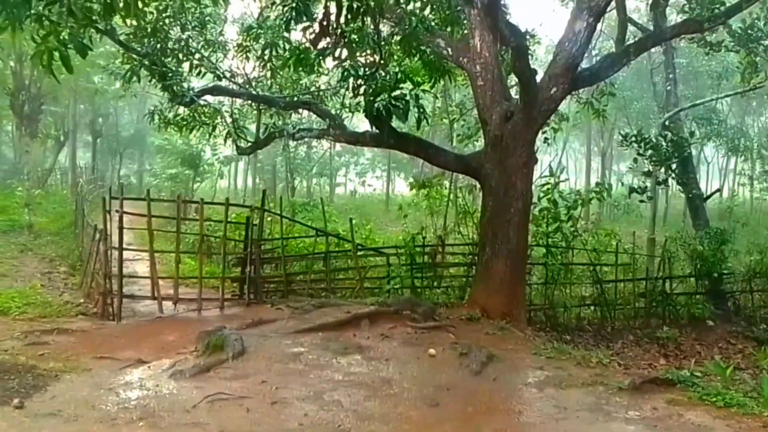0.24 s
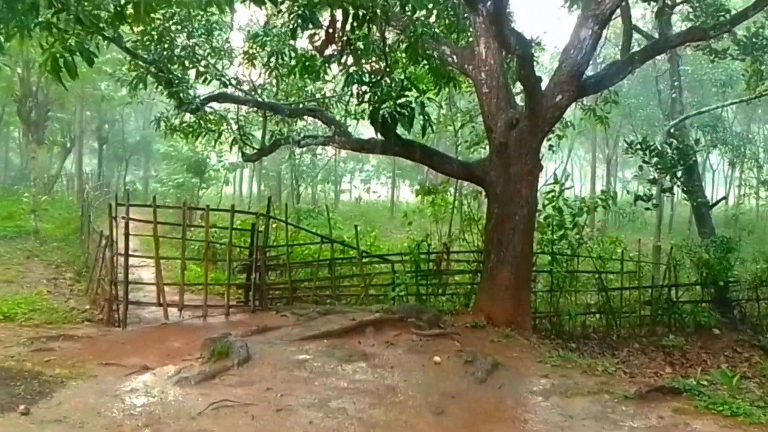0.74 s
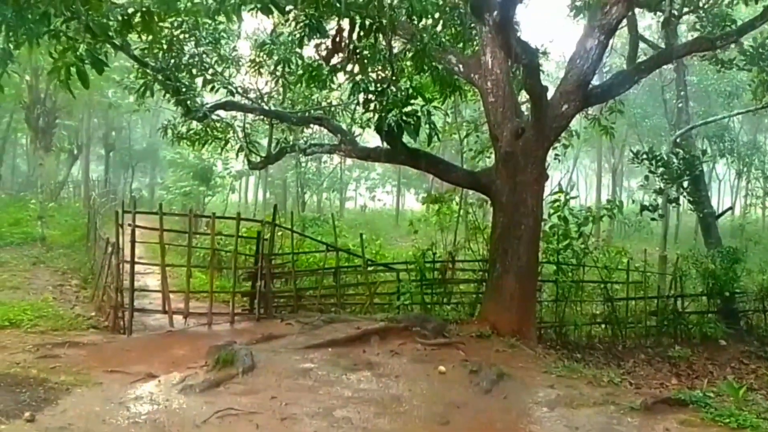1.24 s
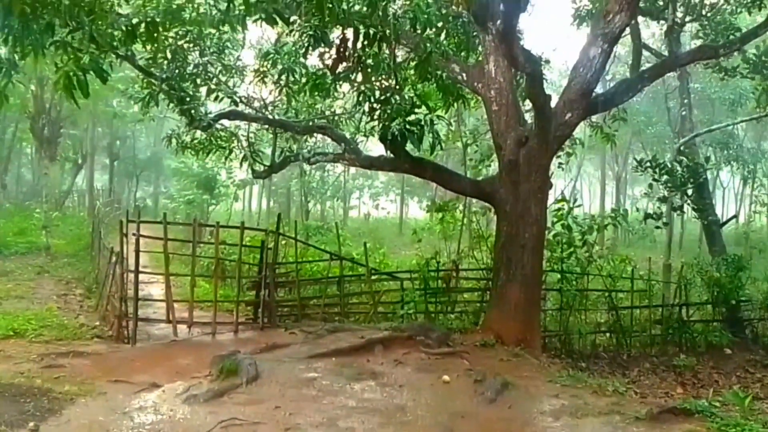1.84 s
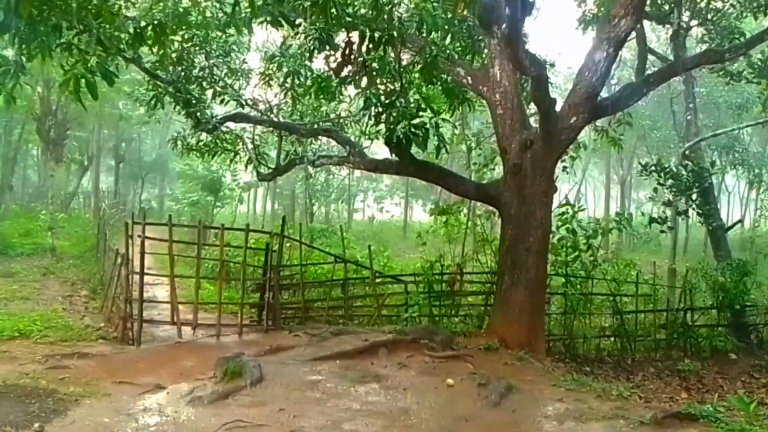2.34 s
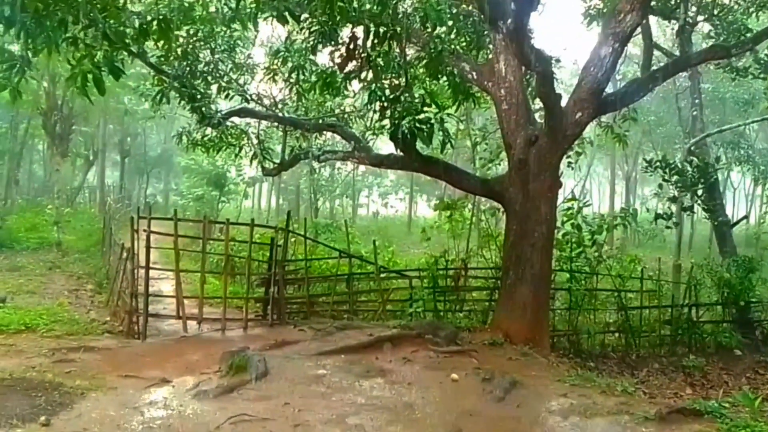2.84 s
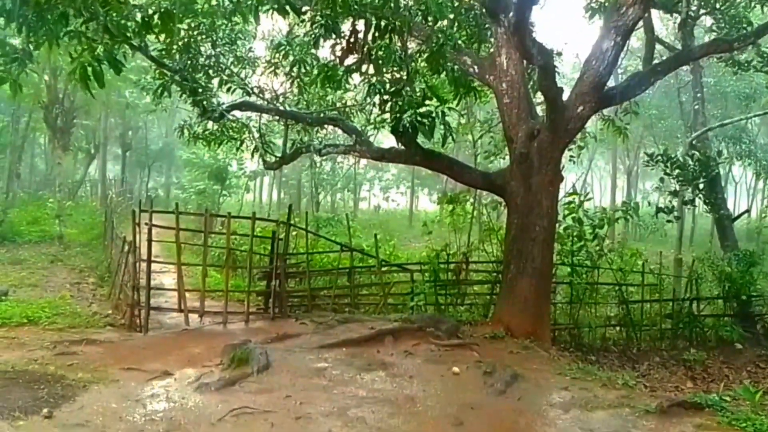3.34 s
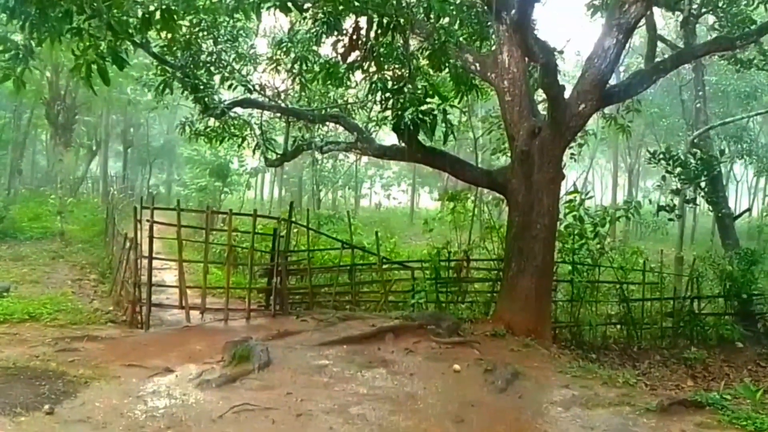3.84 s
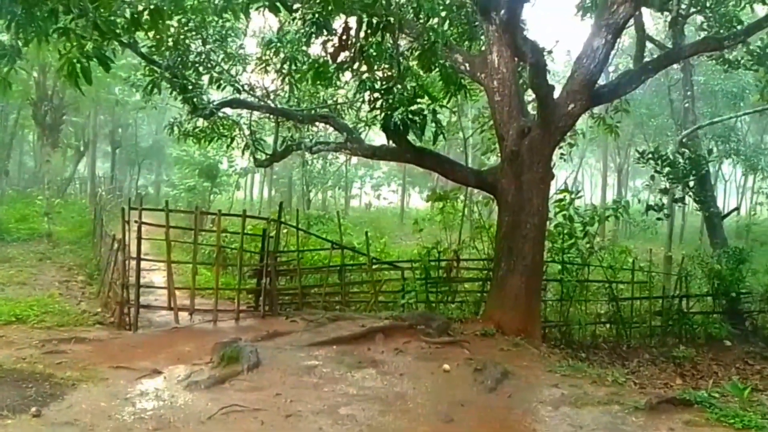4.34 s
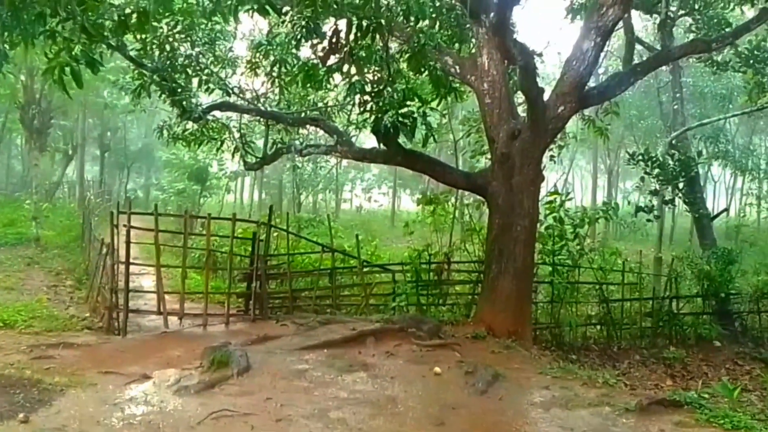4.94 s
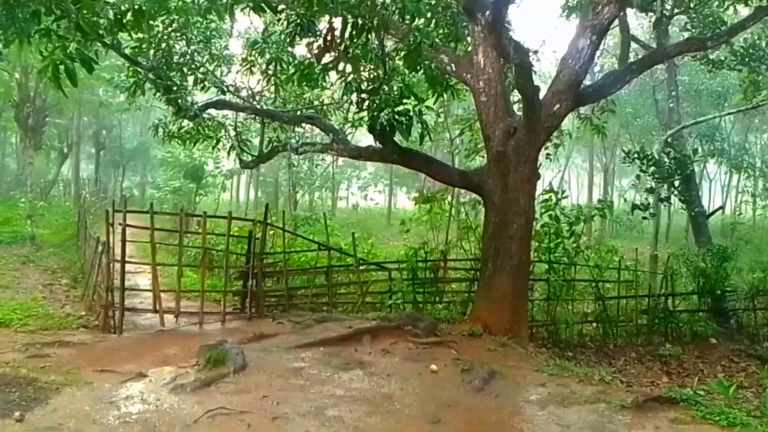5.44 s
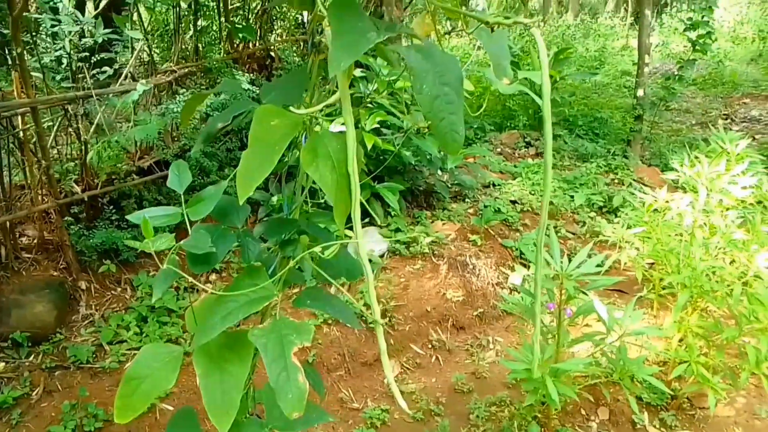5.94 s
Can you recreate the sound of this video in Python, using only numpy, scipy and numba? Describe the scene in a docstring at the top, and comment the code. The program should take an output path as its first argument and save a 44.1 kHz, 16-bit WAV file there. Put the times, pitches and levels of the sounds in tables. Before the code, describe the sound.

From 0 to about 5.6 seconds, heavy rain pours steadily on a tree and wet ground: a dense, full hiss strongest in the mids, gently fluctuating, with grainy patter on leaves. Sharp bright ticks with tiny splashes mark close drops, clearest around 0.6, 3.0, 3.6 and 4.9. Low wind rumble stays faint beneath, swelling slightly near 2.4 with soft low puffs. At 5.58 the rain is chopped off instantly, leaving a dry garden roughly forty decibels quieter, just faint, still air. A small dull woody knock comes at 5.84, a weaker one at 5.89 and a fainter one at 6.18. A very faint high cricket pulses three times from 5.91; a lower one gives three quick strokes from 6.1. Around 6.08 a short gust thumps softly on the microphone, and at 6.11 a distant bird gives one brief nasal note. Single small microphone, centred, close to mono, without reverberation.

```python
"""Heavy rain on a broad tree and wet earth, heard from shelter through one small microphone with a wind filter.
Far drops merge into a hiss of banded noise, nearer ones patter as ringing clicks, the nearest tick and splash.
Wind rumbles throughout as low noise in gusts, with short low-pitched puffs.
At 5.58 s a hard cut leads to a quiet dry garden: faint filtered-noise air, small modal knocks,
two crickets as pulsed tones and a distant bird as a short harmonic note."""
import sys
import numpy as np
from scipy import signal
from scipy.fft import rfft, irfft, next_fast_len
from scipy.io import wavfile
from numba import njit

SR = 44100
rng = np.random.default_rng(int(sys.argv[2]) if len(sys.argv) > 2 else 0)


def linear_from_db(decibels):
    """Turn decibels (scalar or array-like) into linear amplitude factors; 0 gives 1."""
    return 10 ** (np.asarray(decibels, float) / 20)


def digitize_waveform(pressure):
    """Quantize a signal to 16-bit integers and store it at the path in sys.argv[1].

    Rows of a 2-D input are taken as channels; values are limited to [-1, 1].
    """
    field = np.atleast_2d(pressure).T
    bounded = np.clip(field, -1, 1)
    quanta = np.round(bounded * 32767).astype(np.int16)
    wavfile.write(sys.argv[1], SR, quanta)


N = 273714
T_S = np.arange(N) / SR
CUT_S = 5.5765   # rain gives way to garden

# rain before the low cut: t/s, level/dB, full treble tilt/dB
RAINFALL = [(0.0, -26.5, -1), (0.23, -25.5, -1.5), (0.62, -27.5, -0.5), (1.45, -26, -1.5), (2.58, -27, -2),
            (2.74, -25.5, -2), (4.07, -28, -1), (4.18, -26, -1.5), (4.85, -26, -2.5), (4.92, -28, -1),
            (5.56, -26, -2)]
# colouring filter of hiss and patter: f/Hz, gain/dB
RAIN_COLOUR = [(100, 0.5), (380, -9.5), (924, -9), (1150, -4.5), (1370, -1.5), (1600, -6), (2310, -9.5),
               (3160, -16), (4930, -16), (7300, -23), (8550, -20), (10500, -33.5), (12500, -33),
               (15600, -34)]
# moving low edge of the rain: t/s, corner f/Hz of each high-pass stage
LOW_CUT = [(0.0, 290), (1.65, 258), (1.9, 305), (2.08, 398), (2.25, 350), (2.7, 340), (2.9, 296),
           (3.2, 370), (3.3, 250), (4.0, 280), (4.65, 260), (4.8, 200), (5.05, 280), (5.5, 270)]
# loudest near drops on leaves: t/s, click level before filters/dB, splash re click/dB, splash decay/s
NEAR_DROPS = [(0.0548, -31, -6, .01), (0.1595, -31, -4, .01), (0.356, -31, -1, .03),
              (0.5257, -28, -10, .01), (0.6394, -25, -8, .01), (1.1333, -29, -6, .035),
              (1.8018, -31, 0, .01), (1.9565, -26, -4, .01), (2.3496, -29, -4, .01),
              (2.7357, -29, -1.5, .03), (2.9711, -25, -8, .015), (3.6007, -23.5, -8, .01),
              (4.2462, -30, -5, .01), (4.8803, -22, -8, .01)]
# lesser near drops, at random moments
SMALL_DROPS_COUNT, SMALL_DROP_DB, SMALL_SPREAD_DB = 20, -32, 1
SMALL_SPLASH_DB, SMALL_SPLASH_S = -4, .01   # re click; decay
SPLASH_HZ, SPLASH_LOG_SPREAD = 5000, 0.13   # splash centre, scatter of its natural log
SPRAY_DB = -11   # noise above 9 kHz, re splash

CALM_DB = -71.5   # rumble on the microphone port between gusts
# gusts on the port: top t/s, level over calm/dB, rise to top/s, fall/s (both to 1/e of the dB swell)
GUSTS = [(2.45, 11, .3, .2), (3.1, 4, .15, .15), (4.9, 3, .3, .2), (5.7, 3, .05, .3), (6.078, 17, .008, .1)]
# puffs on the port: centre t/s, envelope peak level/dB, centre f/Hz, glide/(Hz/s), half width to 1/e/s
PUFFS = [(2.35, -43, 80, 0, 0.009), (2.47, -49, 99, 1500, 0.031), (6.077, -50, 110, 0, .006),
         (6.092, -40.5, 96.5, 0, 0.0062)]

# garden knocks: t/s, strike level/dB
KNOCKS = [(5.8432, -54), (5.887, -62), (6.182, -65)]
# modes of every knock: f/Hz, level re strike/dB, t60/s
KNOCK_MODES = [(950, -3, .03), (1200, -9, .2), (1400, 0, .045), (2100, -12, .02), (4000, -22, .015)]
# two crickets: start t/s, strokes, stroke period/s, f/Hz, level/dB
CRICKETS = [(5.91, 3, .055, 6480, -81), (6.1, 3, .034, 3220, -66)]
STROKE_PERIODS, FIRST_STROKE_DB = 1.1, -4   # stroke length; first stroke re the others
BIRD_S, BIRD_HZ, BIRD_DB = 6.112, 710, -71
BIRD_ATTACK_S, BIRD_HOLD_S, BIRD_RELEASE_S = .015, .03, .03
# bird partials: harmonic number, level re BIRD_DB/dB
BIRD_PARTIALS = [(1, 3), (2, -2), (3, 1), (4, -10)]
# colouring filter of the garden air: f/Hz, gain/dB
GARDEN_COLOUR = [(76, -30), (130, -15), (262, -5), (326, -4), (583, -6.5), (1000, -6), (1380, -1),
                 (1820, -5.5), (3500, -13.5), (7390, -23), (8680, -22), (10500, -29), (15500, -36)]
GARDEN_DB, GARDEN_RISE_S = -66.5, 0.033   # air level, fade-in after the cut


def rms_one(x):
    """Scale to rms 1."""
    return x / np.sqrt(np.mean(x ** 2) + 1e-20)


def in_time(rows):
    """Columns of a time table, interpolated at every sample."""
    s, *columns = np.transpose(rows)
    return [np.interp(T_S, s, c) for c in columns]


def coloured(x, points):
    """Minimum-phase filter with the given gain curve, built by folding the cepstrum."""
    size = next_fast_len(N + 8192)
    hz = np.maximum(np.arange(size // 2 + 1) * SR / size, 1)
    point_hz, point_db = np.transpose(points)
    log_gain = np.log(linear_from_db(np.interp(np.log(hz), np.log(point_hz), point_db)))
    fold = irfft(log_gain, size)
    fold[1:size // 2] *= 2
    fold[size // 2 + 1:] = 0
    return irfft(rfft(x, size) * np.exp(rfft(fold)), size)[:N]


def drift(rate_hz):
    """Slow random curve of rms 1: noise through two equal poles, at 1/40 of the sample rate."""
    r = np.exp(-80 * np.pi * rate_hz / SR)
    noise = rng.standard_normal(N // 40 + 2002)
    slow = signal.lfilter([1], [1, -2 * r, r * r], noise)[2000:]   # drop the settling
    return np.interp(np.arange(N) / 40, np.arange(len(slow)), rms_one(slow - slow.mean()))


def band(x, low_hz, high_hz):
    """Butterworth band-pass, second order per edge."""
    sos = signal.butter(2, [low_hz, min(high_hz, .45 * SR)], "band", fs=SR, output="sos")
    return signal.sosfilt(sos, x + 1e-18)


def ring(clicks, hz, t60_s):
    """Two-pole resonator: a unit click starts a decaying sine of height 1."""
    r, w = linear_from_db(-60 / (t60_s * SR)), 2 * np.pi * hz / SR
    return signal.lfilter([0, np.sin(w)], [1, -2 * r * np.cos(w), r * r], clicks + 1e-18)


@njit
def moving_high_pass(x, tune, damping):
    """Two-pole state-variable high-pass whose corner moves sample by sample."""
    out, low, mid = np.zeros(len(x)), 0., 0.
    for i in range(len(x)):
        low += tune[i] * mid
        out[i] = x[i] - low - damping * mid
        mid += tune[i] * out[i]
    return out


def rain():
    """Hiss and patter share one colour and level, near drops join; the wind filter takes the lows away."""
    level_db, brightness_db = in_time(RAINFALL)
    hiss = far_hiss(brightness_db, patchy_db=0.69, shared=0.62)
    drops = hiss + linear_from_db(-10.5) * patter(per_s=2500., spread_db=3.0, cycles=3.4)
    wet = linear_from_db(level_db) * rms_one(coloured(drops, RAIN_COLOUR))
    wet = wet + near_drops(delay_s=.0012)
    tune = 2 * np.sin(np.pi * in_time(LOW_CUT)[0] / SR)
    for damping in (.75, 1.4, 1.8):
        wet = moving_high_pass(wet, tune, damping)
    return wet


def far_hiss(brightness_db, patchy_db, shared):
    """Countless far drops: noise in half-octave bands, swelling partly together, partly alone."""
    out, together = 0, drift(7.0)
    edges_hz = 60 * 2 ** np.arange(0, 8.6, .5)
    white = rng.standard_normal((2, N))
    for k, (low_hz, high_hz) in enumerate(zip(edges_hz, edges_hz[1:])):
        treble = np.clip(np.log2(low_hz / 2000) / 2, 0, 1)   # 0 up to 2 kHz, 1 from 8 kHz
        swell_db = patchy_db * (shared * together + drift(14.0))
        # neighbouring bands take different noise
        out = out + linear_from_db(treble * brightness_db + swell_db) * band(white[k % 2], low_hz, high_hz)
    return rms_one(out)


def patter(per_s, spread_db, cycles):
    """Drops on leaves a few steps away: clumped uneven clicks, each ringing a few cycles at one of 18 pitches."""
    sizes = linear_from_db(spread_db * np.minimum(rng.exponential(1, N), 5)) * rng.choice([-1, 1], N)
    born = rng.random(N) < per_s * linear_from_db(1.5 * drift(14.0)) / SR
    pitches_hz = np.geomspace(500, 15000, 18)
    dealt = rng.integers(0, 18, N)
    out = np.zeros(N)
    for k, hz in enumerate(pitches_hz):
        out += ring(sizes * born * (dealt == k), hz, cycles / hz) * hz
    return rms_one(out)


def near_drops(delay_s):
    """Listed and random drops: a filtered click ticks at the head of a decaying splash of noise."""
    out, ticks, age_s = np.zeros(N), np.zeros(N), np.arange(6000) / SR
    drops = list(NEAR_DROPS)
    for _ in range(SMALL_DROPS_COUNT):
        small_db = SMALL_DROP_DB + SMALL_SPREAD_DB * rng.standard_normal()
        drops.append((rng.random() * CUT_S, small_db, SMALL_SPLASH_DB, SMALL_SPLASH_S))
    for s, click_db, splash_db, splash_s in drops:
        at = round((s + delay_s) * SR)
        ticks[at] = linear_from_db(click_db)
        noise = rng.standard_normal(len(age_s))
        hz = SPLASH_HZ * np.exp(SPLASH_LOG_SPREAD * rng.standard_normal())
        splash = band(noise, hz / 1.3, hz * 1.67) + linear_from_db(SPRAY_DB) * band(noise, 9000, 15500)
        out[at:at + len(age_s)] += linear_from_db(click_db + splash_db) * np.exp(-age_s / splash_s) * splash
    # strongest at the port resonance
    return out + linear_from_db(18.5) * band(ticks, 6000, 9800) + linear_from_db(-1) * band(ticks, 10500, 15500)


def wind():
    """Air across the port: lumpy low noise swelling in gusts; puffs push the membrane as brief low sines."""
    rumble = band(band(rng.standard_normal(N), 28, 185), 18, 200) * linear_from_db(2.0 * drift(34.0))
    gust_db = np.zeros(N)
    for s, db, rise_s, fall_s in GUSTS:
        gust_db += db * np.exp(-((T_S - s) / np.where(T_S < s, rise_s, fall_s)) ** 2)
    out = linear_from_db(CALM_DB + gust_db) * rms_one(rumble)
    for s, peak_db, hz, glide_hz_per_s, width_s in PUFFS:
        age_s = T_S - s
        phase = -2 * np.pi * (hz + glide_hz_per_s * age_s / 2) * age_s
        out += linear_from_db(peak_db) * np.exp(-(age_s / width_s) ** 2) * np.sin(phase)
    return out


def knocks():
    """Each knock strikes the same dull modes, doubled by a quick bounce, and rustles out as decaying noise."""
    at = np.array([round(s * SR) for s, db in KNOCKS])
    strikes, out = np.zeros(N), np.zeros(N)
    strikes[at] = linear_from_db([db for s, db in KNOCKS])
    strikes[at + round(.005 * SR)] = .5 * strikes[at]   # bounce
    for hz, level_db, t60_s in KNOCK_MODES:
        out += ring(linear_from_db(level_db) * strikes, hz, t60_s)
    dying = signal.lfilter([1], [1, -linear_from_db(-60 / (.25 * SR))], np.abs(strikes))   # t60 0.25 s
    return out + linear_from_db(-20) * dying * rms_one(band(rng.standard_normal(N), 900, 1900))


def crickets():
    """Wing strokes: evenly spaced, slightly overlapping half-sine pulses of one tone per cricket."""
    out, waver_rad = np.zeros(N), .25 * drift(60.0)
    for start_s, strokes, period_s, hz, db in CRICKETS:
        tone = np.sin(2 * np.pi * hz * T_S + waver_rad)
        for k in range(strokes):
            progress = (T_S - start_s - k * period_s) / (STROKE_PERIODS * period_s)
            pulse = np.sin(np.pi * np.clip(progress, 0, 1))
            out += linear_from_db(db + FIRST_STROKE_DB * (k == 0)) * pulse * tone
    return out


def bird():
    """A distant short nasal note: a few harmonics on a nearly steady pitch."""
    corners_s = np.cumsum([0, BIRD_ATTACK_S, BIRD_HOLD_S, BIRD_RELEASE_S])
    shape = np.interp(T_S - BIRD_S, corners_s, [0, 1, 1, 0])
    phase = 2 * np.pi * np.cumsum(BIRD_HZ * (1 + .004 * drift(40.0))) / SR
    note = sum(linear_from_db(db) * np.sin(k * phase) for k, db in BIRD_PARTIALS)
    return linear_from_db(BIRD_DB) * shape * note


def garden_air():
    """Still air: faint coloured noise, its level flickering, fading in after the cut."""
    air = rms_one(coloured(rng.standard_normal(N), GARDEN_COLOUR)) * linear_from_db(1.1 * drift(25.0))
    rise = np.clip((T_S - CUT_S) / GARDEN_RISE_S, 0, 1) ** 2
    return linear_from_db(GARDEN_DB) * rise * air


def scene():
    """Rain, then a 1.1 ms crossfade to the garden, wind over both; one microphone feeds both channels."""
    raining = np.clip((CUT_S - T_S) / 0.0011, 0, 1)
    garden = garden_air() + knocks() + bird() + crickets()
    return np.tile(raining * rain() + (1 - raining) * garden + wind(), (2, 1))


def band_limit(x):
    """A steep low-pass at the top of the band."""
    return signal.sosfilt(signal.butter(12, 15500, fs=SR, output="sos"), x)


def record(dry):
    """The finished mix as delivered."""
    return band_limit(dry)


dry = scene()
out = record(dry)
digitize_waveform(out)
```